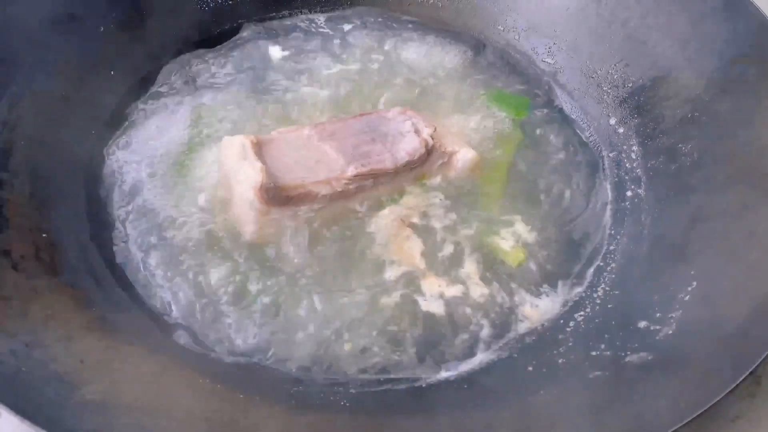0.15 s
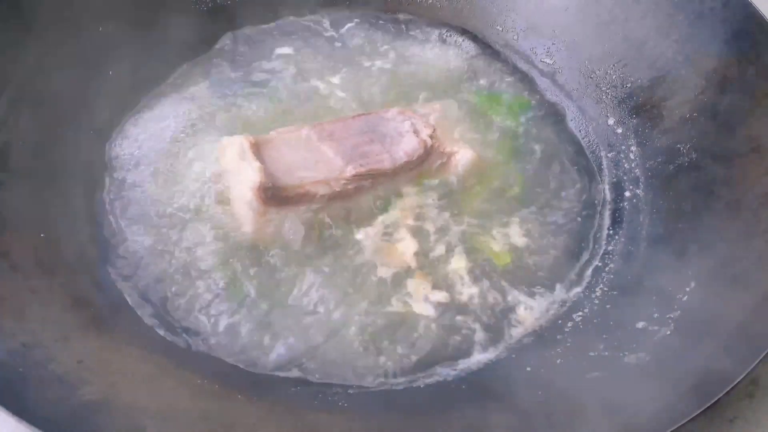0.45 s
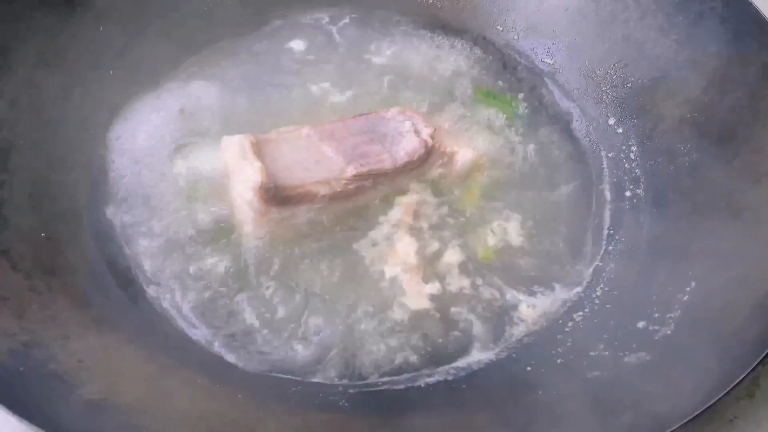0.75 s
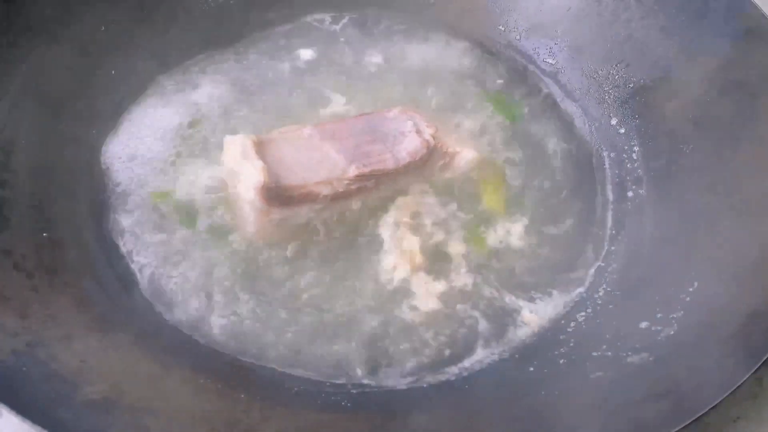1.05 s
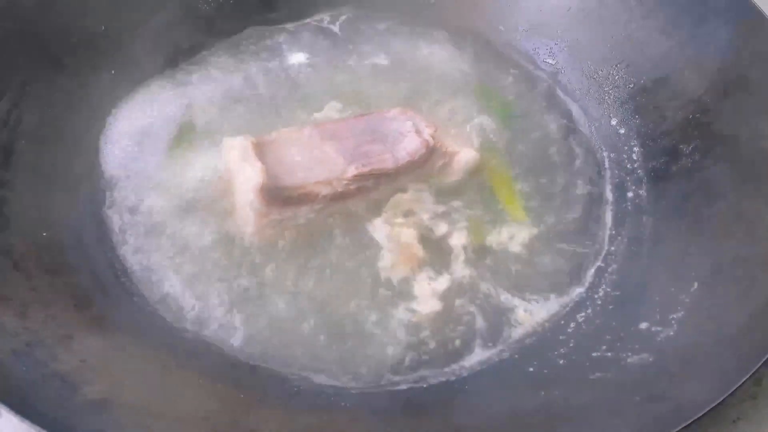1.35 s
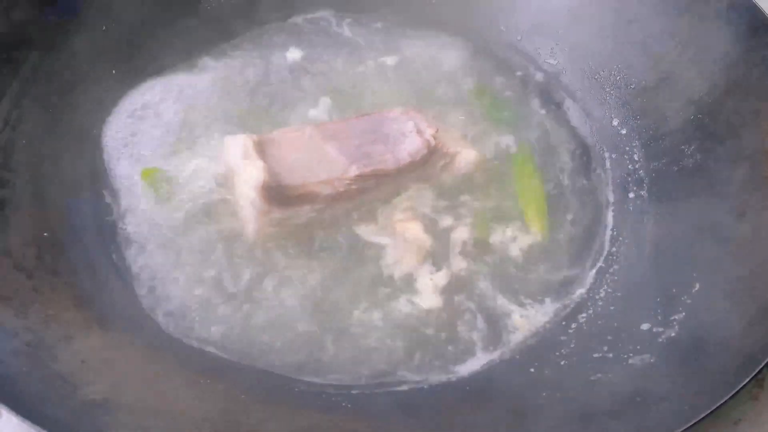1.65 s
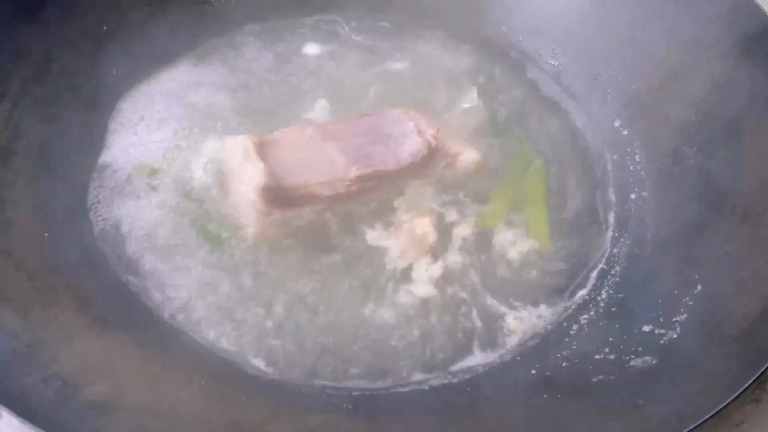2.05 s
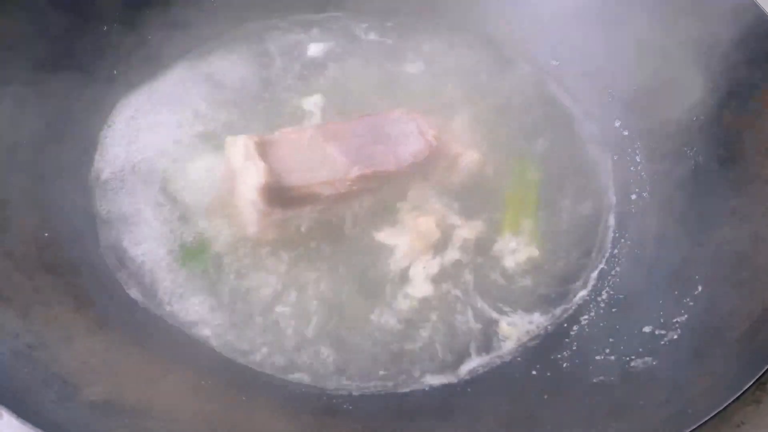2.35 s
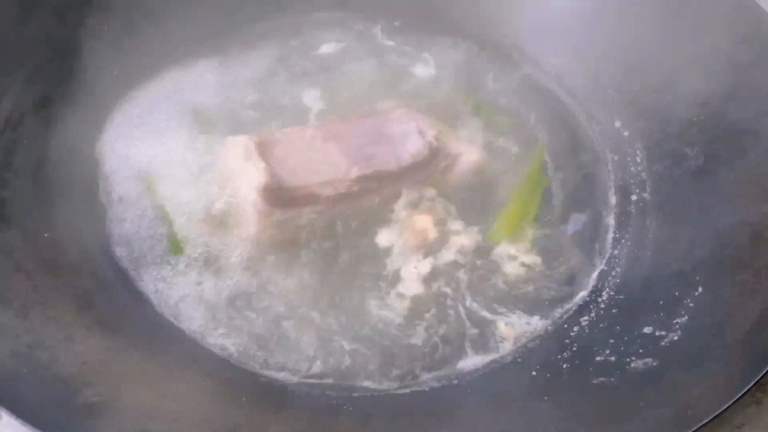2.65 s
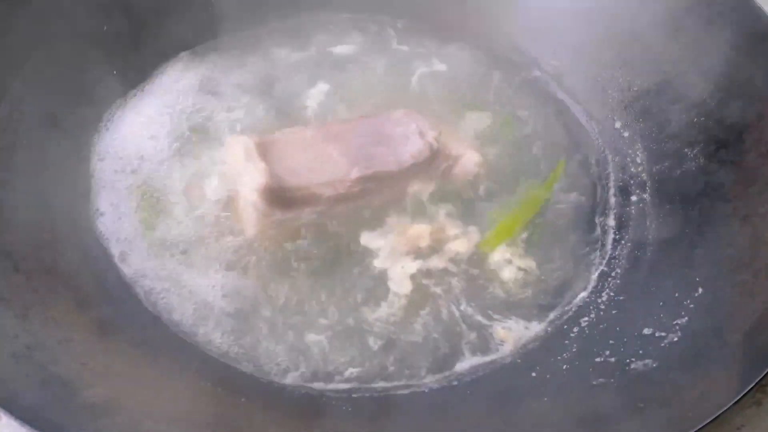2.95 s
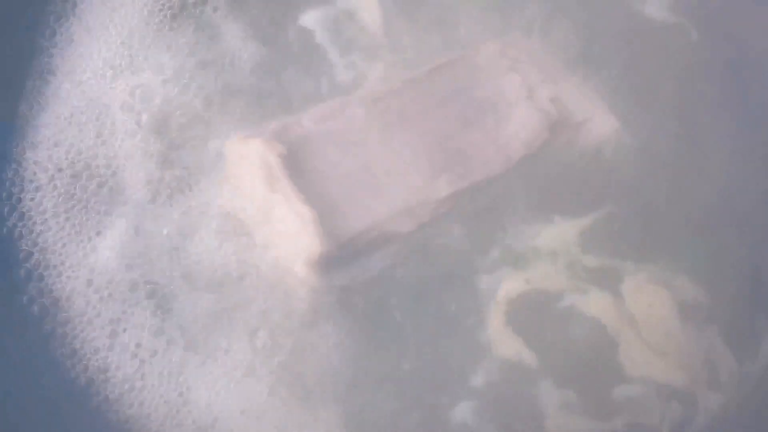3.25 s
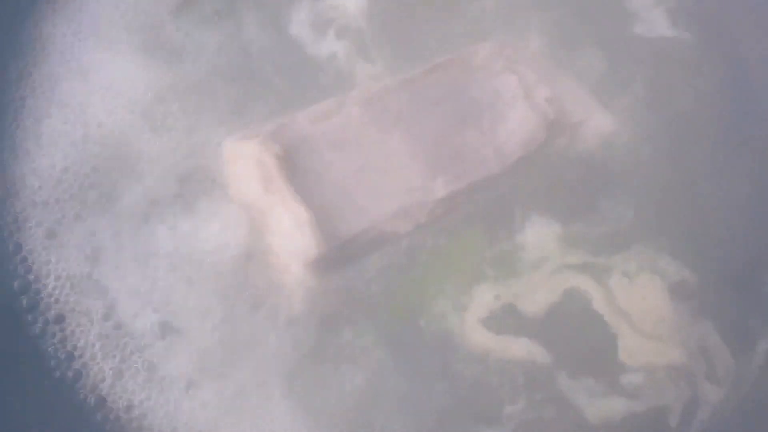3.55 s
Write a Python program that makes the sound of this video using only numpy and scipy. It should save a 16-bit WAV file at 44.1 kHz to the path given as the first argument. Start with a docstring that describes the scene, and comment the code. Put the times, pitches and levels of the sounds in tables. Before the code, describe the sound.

Water boils hard in a large iron wok: low rounded glugs tumble continuously, hollow plops burst at the surface, and foam fizzes softly above. Close stereo microphone; the boil eases at the very end.

```python
"""Large steam bubbles glug in a big iron wok of water at a rolling boil, each one a short swelling tone.
Smaller bubbles plop open at the surface with higher notes and throw up a spray of still smaller ones.
Shaped noise makes the churning water, the fizzing foam and a low rumble; tiny tones tick and spit.
The bowl's ringing colours the glugs, plops, splash and churn. The boil eases towards the end."""
import sys
import numpy as np
from scipy import signal
from scipy.fft import rfft, irfft, next_fast_len
from scipy.io import wavfile
from scipy.ndimage import uniform_filter1d, map_coordinates

SR = 44100
rng = np.random.default_rng(int(sys.argv[2]) if len(sys.argv) > 2 else 0)


def wav_out(sig):
    """Save sig, one row per channel (or a flat mono array), as 16-bit PCM at SR to the path in sys.argv[1]."""
    wavfile.write(sys.argv[1], SR, np.round(np.clip(np.atleast_2d(sig).T, -1, 1) * 32767).astype(np.int16))


N = 163170
TIME = np.arange(N) / SR
SIDES = np.array([[.5], [-.5]])  # left, right

# large steam bubbles: [t/s at the peak, level/dB before the overall trim, f/Hz]
GLUG_EVENTS = [(.1, -43.5, 313), (.253, -38.5, 354), (.304, -31, 346), (.35, -30.5, 358), (.504, -27, 341),
               (.515, -23.5, 210), (.527, -28.5, 206), (.573, -23.5, 211), (.586, -32, 145),
               (.607, -35, 244), (.644, -31, 270), (.7, -26, 210), (.772, -29.5, 270), (.796, -40, 239),
               (.839, -32.5, 264), (.852, -30.5, 192), (.94, -34, 172), (.993, -33, 167),
               (1.027, -22.5, 203), (1.050, -30, 268), (1.159, -25.5, 206), (1.176, -28.5, 196),
               (1.254, -26.5, 250), (1.274, -33, 176), (1.39, -32.5, 208), (1.41, -31.5, 265),
               (1.483, -31, 280), (1.538, -31, 250), (1.562, -31, 152), (1.658, -64, 150),
               (1.733, -31, 224), (1.881, -29, 263), (1.903, -31.5, 185), (1.951, -35.5, 354),
               (2.001, -32, 284), (2.085, -31.5, 256), (2.124, -28.5, 213), (2.148, -29.5, 235),
               (2.207, -31.5, 233), (2.31, -33.5, 205), (2.331, -38, 326), (2.401, -32, 279),
               (2.416, -31, 193), (2.466, -30.5, 197), (2.503, -34, 206), (2.526, -30, 211),
               (2.565, -38.5, 241), (2.722, -33, 282), (2.732, -28, 145), (2.931, -33.5, 185),
               (2.950, -24.5, 214), (2.977, -40.5, 176), (3.09, -34, 192), (3.244, -33, 156),
               (3.344, -37.5, 245), (3.426, -37, 247), (3.51, -38.5, 292), (3.62, -42, 292)]
# bubbles bursting at the surface: [t/s at the peak, level/dB before the overall trim, f/Hz]
PLOP_EVENTS = [(.009, -40.5, 964), (.155, -41.5, 767), (.242, -33.5, 940), (.254, -30.5, 1040),
               (.288, -33, 860), (.309, -41, 984), (.527, -42, 910), (.567, -49, 700), (0.577, -42, 1170),
               (.618, -35, 700), (0.704, -41, 830), (.836, -41.5, 980), (0.92, -22.5, 696),
               (1.019, -40.5, 644), (1.066, -25.5, 826), (1.182, -50, 970), (1.407, -54, 827),
               (1.407, -45.5, 2000), (1.459, -20, 712), (1.534, -37.5, 980), (1.552, -37.5, 1040),
               (1.734, -41, 750), (1.76, -45.5, 1720), (2.082, -44.5, 1660), (2.134, -45, 820),
               (2.203, -28.5, 1090), (2.213, -34.5, 1170), (2.333, -32.5, 1020), (2.718, -34.5, 930),
               (2.942, -33, 1010), (2.949, -38, 1130), (3.153, -44, 753), (3.623, -42.5, 884)]
# strength of the boil over time: [t/s, relative level/dB]
BOIL_STRENGTH = [(0, -7.5), (.19, -5), (.28, 1.5), (.44, -0.5), (.53, -4), (.8, -2), (1.17, 0.5),
                 (1.33, -3), (1.53, 3), (1.8, -1.5), (2.12, 1), (2.27, -1), (2.45, 0), (2.83, -2),
                 (3.05, 2), (3.3, -4.5), (3.57, -5.5), (3.7, -12)]


def amp(db):
    """Turn decibels into a plain factor."""
    return 10 ** (np.asarray(db) / 20)


def unit(x):
    """Scale a sound to an average (rms) strength of 1."""
    return x / np.sqrt(np.mean(x ** 2) + 1e-20)


def along(points, hz):
    """Read [f/Hz, value] points at any pitch, on a logarithmic axis."""
    f, value = np.transpose(points)
    return np.interp(np.log(hz + 1), np.log(f + 1), value)


def curve(rows, axis=1):
    """One column of a table over time, one value per sample."""
    cols = np.transpose(rows)
    return np.interp(TIME, cols[0], cols[axis])


def wobble(rate):
    """A smooth random curve with this many random points a second."""
    return map_coordinates(rng.standard_normal(1024), [TIME * rate], mode="wrap")


def filtered(x, response):
    """Strengthen or weaken each frequency of x by the given response."""
    m = next_fast_len(N + SR // 2)
    hz = np.fft.rfftfreq(m, 1 / SR)
    return irfft(rfft(x, m) * response(hz), m)[..., :N]


def noise(spectrum, side_db):
    """Coloured stereo noise of rms 1; side_db sets its width."""
    white = rng.standard_normal((2, N))
    mid, side = filtered(white, lambda hz: amp(along(spectrum, hz)))
    side = amp(side_db) * side
    return unit(np.array([mid + side, mid - side]))


def patchy(x, depth_db):
    """Each band of a hiss swells and sinks by itself, many times a second."""
    bands = signal.stft(x, nperseg=1024)[2]
    field = rng.standard_normal(bands.shape[1:])
    field = uniform_filter1d(field, size=7, axis=0)  # smooth over frequency
    field = uniform_filter1d(field, size=4, axis=1)  # smooth over time
    uneven = bands * amp(depth_db * unit(field))
    return unit(signal.istft(uneven, nperseg=1024)[1][:, :N])


def bubbles(rows, rise_s, glide, size, tail_db=-60):
    """Each [t/s, level/dB, f/Hz] row swells and dies away with a slower after-ring while its pitch glides."""
    # how each pitch differs between the ears: [f/Hz, left minus right level/dB]
    balance_db = [(110, 1.5), (170, 0.5), (220, -3.5), (320, -8), (450, -12), (600, 0), (730, 3.5),
                  (950, 1.5), (1200, 7), (4000, 15)]
    # how far the left wave is ahead of the right: [f/Hz, phase/rad]
    left_lead = [(80, 0.8), (150, 0.2), (280, -0.34), (430, -1.5), (600, 4.5), (760, 4), (980, 2),
                 (1150, 2), (1500, 3), (4000, -0.5)]

    def bump(v):
        return (v * np.exp(1 - v)) ** 2

    s, db, hz = np.transpose(rows)[:, :, None]
    u = np.arange(size) / SR / rise_s  # time from the start; 1 is the peak
    phase = 2 * np.pi * hz * rise_s * (u - 1) * (1 + glide * (u - 1) / 2)
    swell = bump(u) + amp(tail_db) * bump(u / 3.1)  # the after-ring is 3.1 times slower
    at = np.round((s - rise_s) * SR).astype(int) + np.arange(size)
    inside = (at >= 0) & (at < N)
    ears = []
    for side in SIDES:
        level = amp(db + side * along(balance_db, hz))
        wave = level * swell * np.cos(phase + side * along(left_lead, hz))
        ears.append(np.bincount(at[inside], wave[inside], N))
    return np.array(ears)


def swarm(centre_hz, spread, scatter_db, cycles, glide, count, size):
    """Bubbles of scattered size and pitch at random moments, each rising over the given cycles; rms 1."""
    z = rng.random((count, 3))
    offset = np.log(z[:, 2] / (1 - z[:, 2])) / 2  # most pitches lie near the centre
    hz = centre_hz * np.exp(spread * np.clip(offset, -2, 2))
    rows = np.column_stack([z[:, 0] * N / SR, scatter_db * z[:, 1] ** 2, hz])
    return unit(bubbles(rows, cycles / hz[:, None], glide, size))


def surge(rows, rise_s, fall_s):
    """How hard the water is stirred: it flares around every bubble of a table, by that bubble's size."""
    power = np.zeros(N)
    for s, db, hz in rows:
        near = abs(TIME - s) < .1
        t = TIME[near] - s
        width_s = np.where(t < 0, rise_s, fall_s)
        power[near] += amp(db) ** 2 * np.exp(-(t / width_s) ** 2)
    return np.sqrt(power)


def echoes(x, t60, wet_db, count=14):
    """Short reflections between water and iron, blending from one random pattern to the next."""
    t = np.arange(4096) / SR
    fade = amp(-60 * t / t60) * (1 - np.exp(-(t / .0024) ** 2))  # builds up over about 2.4 ms
    tails = rng.standard_normal((count, 2, len(t))) * fade
    tails /= np.linalg.norm(tails, axis=2, keepdims=True)
    place = np.linspace(0, count - 1, N)
    share = np.maximum(0, 1 - abs(place - np.arange(count)[:, None]))
    source = (share * x[0])[:, None]  # the left side feeds the echoes
    return amp(wet_db) * signal.oaconvolve(source, tails, axes=2).sum(0)[:, :N]


def glugs(stir):
    """Big bubbles wobble under the surface as low tones, each amid a swarm of lesser ones."""
    big = amp(-4.5) * bubbles(GLUG_EVENTS, rise_s=0.0034, glide=0.017, size=4096, tail_db=-26.5)
    lesser = swarm(centre_hz=326, spread=0.35, scatter_db=10, cycles=1.17, glide=0.02, count=700, size=4096)
    lesser_level = amp(curve(BOIL_STRENGTH) - 54) + amp(-19) * stir
    dry = big + lesser_level * lesser
    return dry + echoes(dry, t60=0.066, wet_db=-11).mean(0)


def plops(stir):
    """Bubble caps burst with a hollow note of a few cycles; small ones follow the stirring."""
    loud = amp(1.0) * bubbles(PLOP_EVENTS, rise_s=0.0017, glide=-0.0036, size=1500, tail_db=-38)
    lesser = swarm(centre_hz=801, spread=0.35, scatter_db=13, cycles=0.98, glide=0.087, count=500, size=2000)
    lesser_level = amp(curve(BOIL_STRENGTH) - 62.5) + amp(-27.5) * stir
    dry = loud + lesser_level * lesser
    return dry + echoes(dry, t60=0.082, wet_db=-14)


def splash(stir):
    """Torn water folds back around each burst and traps a spray of small bubbles."""
    # bursts below this pitch open cleanly and throw less spray
    tear_hz, tear_db_per_octave = 1060, 26
    tears = []
    for s, db, hz in PLOP_EVENTS:
        octaves_below = min(0, np.log2(hz / tear_hz))
        tears.append((s, db + tear_db_per_octave * octaves_below, hz))
    torn = surge(tears, rise_s=0.0079, fall_s=0.0068)
    spray = swarm(centre_hz=978, spread=0.26, scatter_db=12.0, cycles=1.95, glide=0.0074, count=2200, size=800)
    return (amp(-11.0) * torn + amp(-39.5) * stir + amp(curve(BOIL_STRENGTH) - 64)) * spray


def churn(stir):
    """The rolling water under the single bubbles: noise that follows the boil and the stirring."""
    # colour of the churning: [f/Hz, relative level/dB]
    churn_colour = [(50, -27), (100, -2), (200, 0), (320, -1.5), (480, -7), (750, -26.5), (1050, -12),
                    (1400, -30.5), (2000, -25), (4000, -49)]
    steady = amp(curve(BOIL_STRENGTH) - 62.5 + 3.5 * wobble(23.66))
    level = steady + amp(-18.5) * stir
    return level * noise(churn_colour, side_db=-3.5) * amp(-3 * SIDES)


def wok(x):
    """The filled bowl rings along with the water at a few pitches of its own."""
    # ringing of the filled wok: [f/Hz, width/Hz, level/dB]
    bowl_rings = [(130.3, 10.7, 7.5), (189.6, 16.8, 2.5), (533, 81, -1), (974, 73, -1.5), (1084, 6.7, -1),
                  (1216, 40, -4)]

    def response(f):
        total = 1
        for centre, width, db in bowl_rings:
            total = total + amp(db) * 1j * f * width / (centre * centre - f * f + 1j * f * width)
        return total

    return filtered(x, response)


def simmering(simmer_db):
    """Tiny bubbles simmer on the iron as patchy hiss, small beads of tone, crackles and ticks."""
    # colour of the simmer: [f/Hz, relative level/dB]
    simmer_colour = [(500, -9), (1200, -1.5), (1600, -2), (2250, -1.5), (2750, 4), (3050, 0.5), (3300, -5),
                     (4800, -9.5), (5400, -11), (5750, -11), (6300, -16), (8000, -21.5), (15000, -53)]
    hiss = patchy(noise(simmer_colour, side_db=1.5), depth_db=2.0)
    hiss = amp(simmer_db + 4.5 + 0.9 * wobble(29.88)) * hiss * amp(1.06 * SIDES)
    beads = swarm(centre_hz=2786, spread=.26, scatter_db=32, cycles=4.9, glide=0.0063, count=500, size=1500)
    crackle = swarm(centre_hz=4130, spread=0.3, scatter_db=19, cycles=1.2, glide=0, count=200, size=400)
    ticks = swarm(centre_hz=10150, spread=0.2, scatter_db=16, cycles=2.0, glide=.01, count=600, size=128)
    ticks = ticks.mean(0)  # the same on both sides
    return hiss + amp(simmer_db - 17.5) * beads + amp(simmer_db - 15) * crackle + amp(simmer_db - 7) * ticks


def fizzing(fizz_db):
    """The scum fizzes: high noise, nearly the same on both sides, with a fast flutter."""
    # colour of the fizz: [f/Hz, relative level/dB]
    fizz_colour = [(2500, -22), (4600, 2), (5600, -8), (7000, 1), (8800, -0.5), (10200, 4.5), (12200, 5),
                   (13300, -8.5), (14500, -4), (16000, -8.5)]
    return amp(fizz_db + 0.1 + 0.87 * wobble(110)) * noise(fizz_colour, side_db=-59)


def spitting():
    """Droplets spit on the hot iron as very short high tones with a brief echo."""
    # single spits: [t/s at the peak, level/dB before the overall trim, f/Hz]
    spit_events = [(.303, -54, 4160), (.303, -59, 10000), (.326, -57, 11400), (.63, -61, 10600),
                   (.675, -58.5, 9700), (.819, -59, 4500), (1.097, -56.5, 11000), (1.335, -60, 9600),
                   (1.355, -57.5, 9300), (1.37, -65, 4000), (1.449, -63, 6870), (1.572, -64, 10600),
                   (2.252, -59, 3970), (2.396, -55.5, 9500), (2.629, -58.5, 4000)]
    spits = amp(12.5) * bubbles(spit_events, rise_s=0.00018, glide=0.02, size=256)
    return spits + echoes(spits, t60=0.0082, wet_db=-7).mean(0)


def foam():
    """The simmer, the fizz and the spitting droplets together."""
    # strength of the foam, before each layer's trim: [t/s, fizz level/dB, simmer level/dB]
    foam_levels = [(0, -64.5, -62), (.6, -66, -64), (1.2, -66, -63.5), (1.8, -66, -63.5),
                   (1.92, -61, -62.5), (2.1, -64.5, -62.5), (2.4, -62, -63), (3.15, -60, -63),
                   (3.43, -62, -68), (3.6, -69.5, -71.5), (3.68, -63, -65.5)]
    return simmering(curve(foam_levels, axis=2)) + fizzing(curve(foam_levels)) + spitting()


def rumble():
    """The deep heaving of the whole pot: wavering low noise and one deep thump of the water."""
    # level of the rumble before its trim: [t/s, level/dB]
    rumble_level = [(0, -70), (.55, -70), (.7, -56.5), (.95, -53), (1.3, -60.5), (1.5, -53.5), (1.9, -55),
                    (2.15, -54), (2.75, -59), (3.02, -66), (3.22, -57), (3.55, -68.5), (3.7, -68.5)]
    # colour of the rumble: [f/Hz, relative level/dB]
    rumble_colour = [(15, -21), (30, 0.5), (50, -2), (80, -5.5), (125, 1.5), (300, -45)]
    thump_s, thump_db, thump_hz = 2.066, -30.5, 65.5
    thump = bubbles([(thump_s, thump_db, thump_hz)], rise_s=0.013, glide=0.02, size=8192)
    level = amp(curve(rumble_level) + 6.5 + 2.3 * wobble(4.6))
    return thump + level * noise(rumble_colour, side_db=-10.5)


def scene():
    """All of the boil in its bowl, with the rumble below and the foam on top."""
    stir = surge(GLUG_EVENTS, rise_s=0.011, fall_s=0.011)  # water moves before and after each big bubble
    water = glugs(stir) + plops(stir) + splash(stir) + churn(stir)
    return amp(-2.5) * wok(water) + rumble() + foam()


def record(dry):
    """Thin out the deepest bass and keep nothing above the band limit."""
    low_cut_hz, top_hz = 63.4, 15700

    def response(hz):
        bass_cut = hz ** 3 / np.hypot(hz ** 3, low_cut_hz ** 3)
        return (hz < top_hz) * bass_cut

    return filtered(dry, response)


dry = scene()
out = record(dry)
wav_out(out)
```